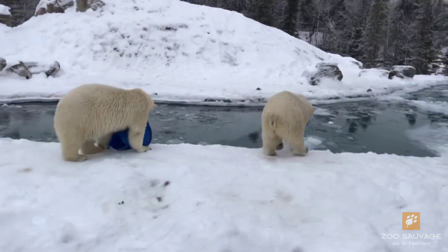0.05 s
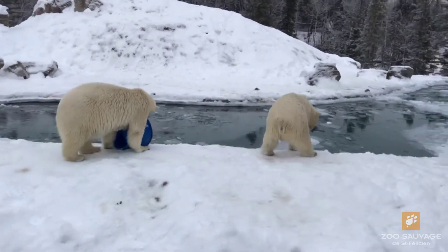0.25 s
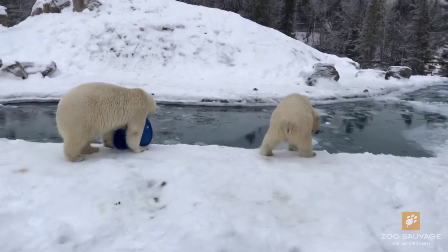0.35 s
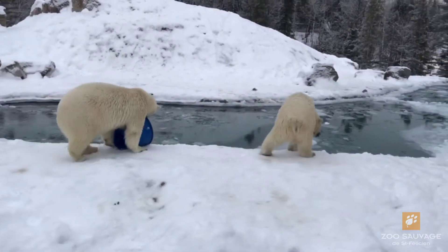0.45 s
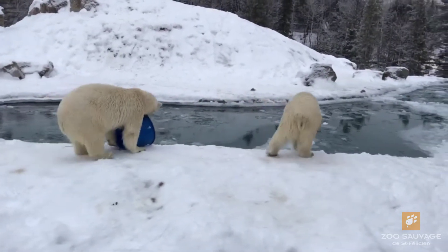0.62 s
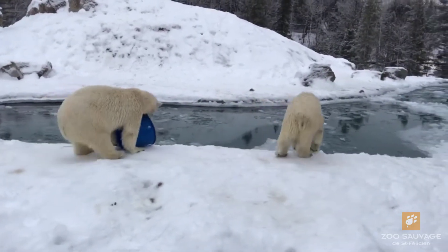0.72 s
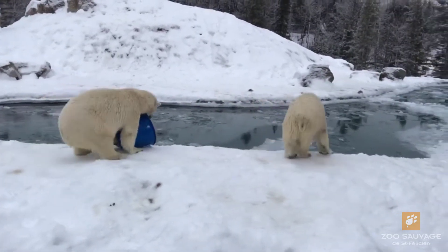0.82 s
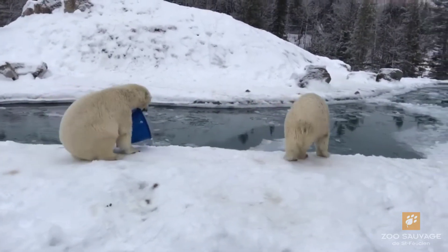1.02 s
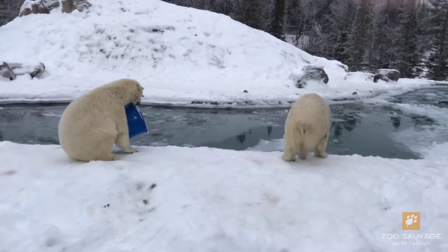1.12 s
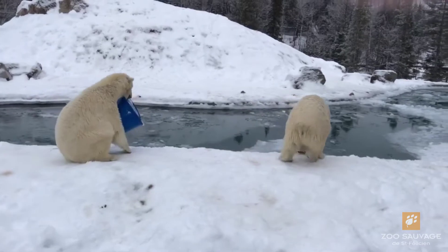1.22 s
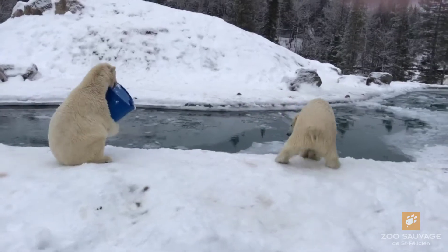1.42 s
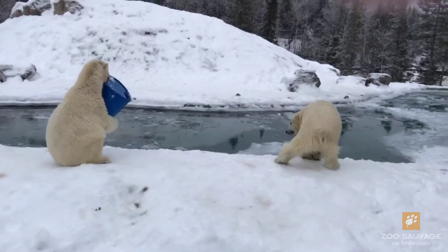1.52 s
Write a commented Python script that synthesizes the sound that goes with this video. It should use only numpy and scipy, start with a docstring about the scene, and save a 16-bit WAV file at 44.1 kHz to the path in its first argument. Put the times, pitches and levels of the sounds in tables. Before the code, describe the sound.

A hollow plastic barrel thumps and knocks as a polar bear shoves it over snow.

```python
"""A hollow plastic barrel, shoved over packed snow by a polar bear, bumped twice and knocked as it is lifted.
The barrel booms in two low modes, clatters in its wall modes and rasps as it slides.
Snow crunches under barrel and paws; an icy crust snaps once and a bit of ice ticks.
Outdoors on one microphone, no echo: the barrel up front, faint wind and water behind."""
import sys
import numpy as np
from scipy import signal
from scipy.fft import rfft, irfft
from scipy.io import wavfile

SR = 44100
rng = np.random.default_rng(int(sys.argv[2]) if len(sys.argv) > 2 else 0)


def transcribe(signal):
    """Save signal, clipped to [-1, 1], as a 16-bit WAV file at the path in sys.argv[1]."""
    frames = np.atleast_2d(signal).T
    limited = np.clip(frames, -1, 1)
    pcm = np.round(limited * 32767).astype(np.int16)
    wavfile.write(sys.argv[1], SR, pcm)


N = 68355
T = np.arange(N) / SR
RING = T[:SR // 2]  # time since a blow [s]
BAND_EDGE_HZ = 9250


def amp(db):
    """Decibels to gain."""
    return 10 ** (np.asarray(db) / 20)


def unit(x):
    """Scales to rms 1."""
    return x / np.sqrt(np.mean(x ** 2) + 1e-20)


def read(points, hz):
    """Reads a table on a log-frequency axis."""
    f, value = np.transpose(points)
    return np.interp(np.log(hz + 1), np.log(f + 1), value)


def add(mix, onset, sound):
    """Mixes a sound in at an onset in seconds."""
    part = mix[max(round(onset * SR), 0):][:len(sound)]
    part += sound[:len(part)]


def colour(x, spectrum):
    """Filters x by a spectrum and scales it to rms 1."""
    gain = amp(read(spectrum, np.fft.rfftfreq(len(x), 1 / SR)))
    return unit(irfft(rfft(x) * gain, len(x)))


def grains(per_s, spread_db):
    """A random train of clicks of uneven size."""
    sizes = rng.standard_normal(N) * amp(spread_db * np.minimum(rng.exponential(1, N), 3))
    return sizes * (rng.random(N) < per_s / SR)


def decaying_sines(partials):
    """A sum of decaying sines at random phases."""
    return sum(amp(db - 60 * RING / t60) * np.sin(2 * np.pi * (hz * RING + rng.random()))
               for hz, db, t60 in partials)


def wind_and_water():
    """A faint, steady bed of wind and water behind the barrel."""
    # background spectrum (frequency [Hz], relative density [dB])
    spectrum = [(15, -73), (25, -42.5), (112, 4.5), (308, -9.5), (480, -29), (557, -40.5), (645, -10.5),
                (786, -11), (1030, -6), (1170, -20.5), (1950, -13.5), (2270, -17.5), (4860, -20.5),
                (5640, -22), (9000, -26.5), (11700, -52.5), (19800, -120)]
    return amp(-61.5) * colour(rng.standard_normal(N), spectrum)


def wall_modes():
    """The main modes of the plastic wall ringing down."""
    # wall resonances (frequency [Hz], relative level [dB], t60 [s])
    modes = [(211, -15, .22), (268, -14, .2), (303, -3, .18), (351, -7, .15), (369, -7, .18),
             (439, -6, .19), (544, -3, .14), (573, -2, .15), (600, -4, .15), (659, -7, .16), (727, -3, .14),
             (819, -6, .15), (895, -4, .14), (949, -6, .14), (990, -6, .14), (1050, -3, .13),
             (1135, -2, .13), (1196, 1, .13), (1355, -11, .11), (1608, -7, .1), (2070, -12, .1),
             (2150, -12, .1)]
    return decaying_sines(modes) / np.sqrt(sum(amp(db) ** 2 for _, db, _ in modes) / 2)


def wall_ring(main, count=220):
    """The wall's answer to a blow: main modes and a crowd of weaker ones that varies with the spot."""
    # strength of the weaker modes (frequency [Hz], relative density [dB])
    crowd_spectrum = [(60, -35), (200, -12), (350, -7), (600, -0.5), (1100, -5), (1600, -1), (2150, -3.5),
                      (2700, -13), (5000, -17.5), (9500, -23)]
    # their decay (frequency [Hz], t60 [s])
    crowd_t60 = [(200, 0.54), (800, .15), (2000, 0.083), (8000, 0.02)]
    edges = np.geomspace(200, BAND_EDGE_HZ, count + 1)
    hz = rng.uniform(edges[:-1], edges[1:])[:, None]
    size = amp(read(crowd_spectrum, hz)) * np.sqrt(hz)
    t = RING[:len(RING) // 2]
    decay = amp(-60 * t / read(crowd_t60, hz))
    crowd = (size * decay * np.sin(2 * np.pi * (hz * t + rng.random(hz.shape)))).sum(0)
    ring = amp(-1.5) * main
    add(ring, 0, amp(-5) * crowd / np.sqrt((size ** 2).sum() / 2))
    return ring * np.minimum(RING / .0015, 1)  # a blow takes 1.5 ms to spread over the wall


def barrel_drag():
    """Small slips over the snow rasp and set the wall ringing."""
    # course of the rasp (time [s], level [dB])
    course = [(0, -50), (.05, -61), (.098, -65.5), (.118, -50.5), (.16, -43), (.19, -45.5), (.235, -41.5),
              (.28, -49.5), (.33, -44.5), (.375, -49.5), (.41, -48), (.45, -47), (.52, -50), (.57, -54.5),
              (.68, -62.5), (.82, -66), (.9, -59.5), (.95, -45), (1.0, -45), (1.1, -65.5)]
    # plastic sliding on snow (frequency [Hz], relative density [dB])
    rasp_spectrum = [(50, -35), (110, 8.5), (230, 3), (350, 6.5), (460, 1.5), (650, 7), (900, -3.5),
                     (1250, 1), (1800, -7.5), (2600, -16.5), (4000, -16.5), (9000, -31)]
    slips = grains(per_s=1500, spread_db=1)
    level = amp(np.interp(T, *np.transpose(course)))
    ring = wall_ring(wall_modes())
    ringing = signal.fftconvolve(level * unit(slips), ring / np.linalg.norm(ring))[:N]
    return level * colour(slips, rasp_spectrum) + amp(-9) * ringing


def snow_crunches():
    """Snow gives under paws and barrel: bright grit over duller packing, swelling and fading."""
    # crunches (peak time [s], rise [s], fall [s], grit level [dB], packing level [dB])
    crunches = [(0.034, .035, 0.1, -53.5, -57.5), (0.118, .015, 0.035, -50, -62),
                (0.157, .02, 0.016, -48.5, -47), (0.242, .055, 0.029, -44, -55),
                (0.34, .02, 0.095, -55.5, -56.5), (0.429, .04, 0.026, -57, -55),
                (0.466, 0.012, 0.021, -46, -58.5), (0.523, .03, 0.038, -58, -51.5),
                (0.595, .012, .02, -56, -48.5), (0.688, .025, 0.026, -61.5, -60),
                (0.87, .1, 0.054, -52, -54.5), (0.869, 0.0014, .009, -41.5, -50),
                (0.891, .002, 0.014, -48.5, -75), (0.976, .045, 0.02, -51.5, -44.5),
                (1.306, .02, 0.016, -61.5, -61.5), (1.349, .016, 0.033, -51, -66),
                (1.429, 0.038, 0.057, -63, -54), (1.474, .05, 0.043, -58, -54.5)]
    # bright grit (frequency [Hz], relative density [dB])
    grit_spectrum = [(200, -30.5), (1200, -13), (2600, 2), (3900, 7), (5200, 4), (7000, 4), (8700, 4.5),
                     (9600, -1.5)]
    # snow packing down (frequency [Hz], relative density [dB])
    packing_spectrum = [(80, -15.5), (300, -7), (700, -10), (1200, -5), (1700, -2.5), (2600, -8),
                        (4000, -10), (9000, -24.5)]
    grit_power, packing_power = np.zeros((2, N))
    for peak, rise, fall, grit_db, packing_db in crunches:
        swell = amp(-14 * np.maximum((peak - T) / rise, (T - peak) / fall) ** 1.05)
        grit_power += (amp(grit_db) * swell) ** 2
        packing_power += (amp(packing_db) * swell) ** 2
    return sum(np.sqrt(power) * colour(grains(per_s=6000, spread_db=-2), spectrum)
               for power, spectrum in [(grit_power, grit_spectrum), (packing_power, packing_spectrum)])


def wall_knocks():
    """Each knock rings the wall, duller for a softer contact, and cracks the icy snow."""
    # knocks (onset [s], ring [dB], dull above [Hz], crack [dB], damping by paw and snow [dB/s])
    knocks = [(.102, -45, 1200, -66, 200), (.116, -44.5, 2560, -57, 87), (.152, -40.5, 3000, -61, 204),
              (0.165, -40.5, 880, -68, 218), (0.234, -32, 960, -54, 204), (0.293, -43, 1740, -59, 204),
              (0.318, -47, 1970, -54, 203), (0.39, -41.5, 2500, -48.5, 198.5), (.462, -32.5, 890, -66, 349),
              (0.481, -39, 2000, -38, 303), (0.4852, -31.5, 3600, -41.5, 64),
              (0.594, -32.5, 800, -54.5, 398), (0.611, -28.5, 417, -78, 149), (.9565, -28, 2460, -69, 22),
              (.9702, -25.5, 1370, -57, 23), (.9839, -31, 1300, -65, 15)]
    # brittle crack of icy snow (frequency [Hz], relative density [dB])
    crack_spectrum = [(300, -38), (2000, -3.5), (3300, -14), (4500, 1), (7200, 0.5), (9500, -9)]
    crack_rise_s, crack_t60_s = .001, .04
    out, main = np.zeros(N), wall_modes()
    for onset, ring_db, dull_hz, crack_db, damping in knocks:
        contact = signal.butter(2, min(dull_hz, BAND_EDGE_HZ), fs=SR)
        add(out, onset, amp(ring_db - damping * RING) * signal.lfilter(*contact, wall_ring(main)))
        burst = np.minimum(RING / crack_rise_s, 1) * amp(crack_db - 60 * RING / crack_t60_s)
        add(out, onset, burst * colour(rng.standard_normal(len(RING)), crack_spectrum))
    return out


def barrel_bumps():
    """A soft push dents the wall with a dull thud and swells two low modes, which then die away."""
    # bumps (onset [s], push length [s], lower mode [dB], upper mode [dB], t60 [s])
    bumps = [(.163, 0.072, -53, -44.5, .15), (.232, 0.034, -38, -40.5, .15),
             (.308, 0.023, -49.5, -37.5, 0.38), (.352, 0.026, -37.5, -44.5, 0.35),
             (.4615, 0.043, -36.5, -19.5, 0.078), (.518, 0.038, -48.5, -35, 0.33),
             (0.5969, 0.038, -29, -20, 0.16), (0.965, 0.0348, -37.5, -41.5, 0.33),
             (1.42, 0.062, -55.5, -63, 0.28)]
    lower_hz, upper_hz, dent_s = 110.3, 162.16, .0014
    out = np.zeros(N)
    for onset, push_s, lower_db, upper_db, t60 in bumps:
        force = np.sin(np.pi * np.minimum(RING / push_s, 1))
        decay = amp(-60 * RING / t60)  # short while a paw damps the barrel
        swell = signal.fftconvolve(force, decay)[:len(RING)]
        lower = amp(lower_db) * np.sin(2 * np.pi * lower_hz * RING)
        upper = amp(upper_db) * np.sin(2 * np.pi * upper_hz * RING)
        dent_time = (RING - .527 * push_s) / dent_s  # the wall dents and springs back in mid-push
        thud = -amp(lower_db - 4.5) * 2 * dent_time * np.exp(-dent_time ** 2)
        add(out, onset, swell / swell.max() * (lower + upper) + thud)
    return out


def crust_snap():
    """A crust of ice gives under the first big bump: a short burst of clicks makes one bright snap."""
    # brief, narrow treble peaks that colour the snap (frequency [Hz], relative level [dB], t60 [s])
    peaks = [(1750, -9, .03), (2100, -5, .04), (2550, -6, .03), (2880, -10, .015), (4250, -7, .012),
             (4700, -2, .018), (5120, -3, .012), (5600, -6, .01), (6150, -6, .012), (6780, -2, .012),
             (7150, 1, .015), (7620, -2, .014), (8700, -5, .01)]
    burst_s = .0075
    clicks = rng.choice([-1., 1.], len(RING)) * (rng.random(len(RING)) < .2) * (RING < burst_s)
    snap = signal.fftconvolve(clicks, decaying_sines(peaks))
    snap /= np.sqrt(np.sum(snap ** 2) / (burst_s * SR))
    out = np.zeros(N)
    add(out, onset=.4815, sound=amp(-37.5) * snap)
    return out


def ice_tick(onset=.711, db=-38.5, hz=1296, t60=.0053):
    """One small dry tick of ice: a single tone that dies at once."""
    out = np.zeros(N)
    add(out, onset, amp(db - 60 * RING / t60) * np.sin(2 * np.pi * hz * RING))
    return out


def scene():
    """Barrel, snow and background as they reach the one microphone."""
    blows = barrel_bumps() + wall_knocks() + crust_snap()
    return (blows + barrel_drag() + snow_crunches() + ice_tick() + wind_and_water())[None]


def record(dry):
    """The recorder's low cut and band limit."""
    low_cut_hz = 55
    low_cut = signal.butter(2, low_cut_hz, "high", fs=SR, output="sos")
    band_limit = signal.firwin(511, BAND_EDGE_HZ, window=("kaiser", 9), fs=SR)
    return signal.oaconvolve(signal.sosfilt(low_cut, dry), band_limit[None], "same")


dry = scene()
out = record(dry)
transcribe(out)
```